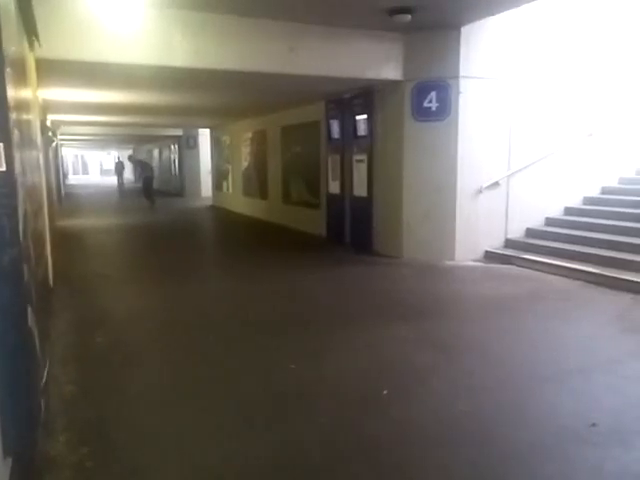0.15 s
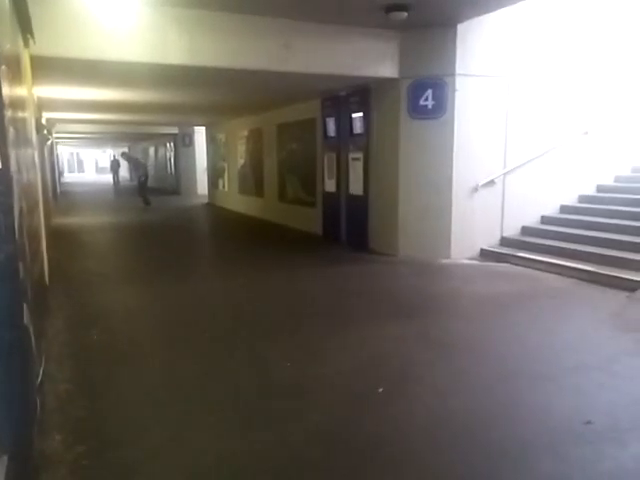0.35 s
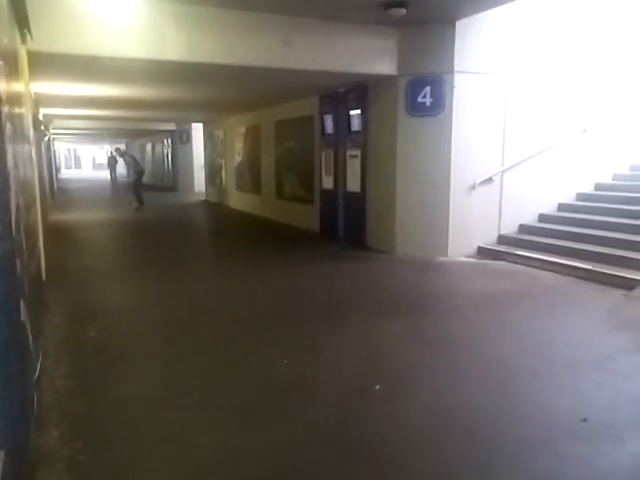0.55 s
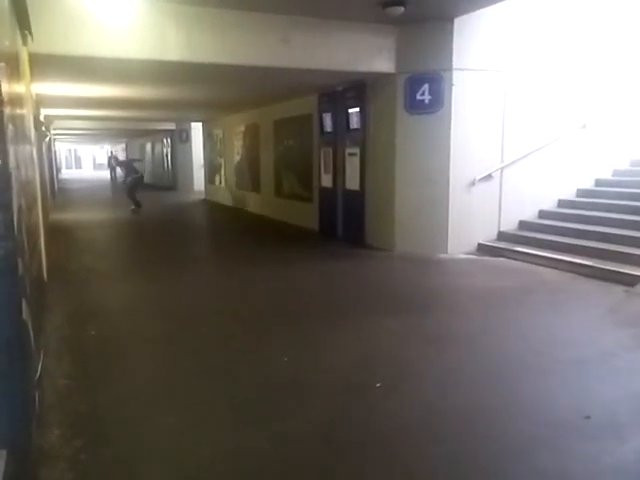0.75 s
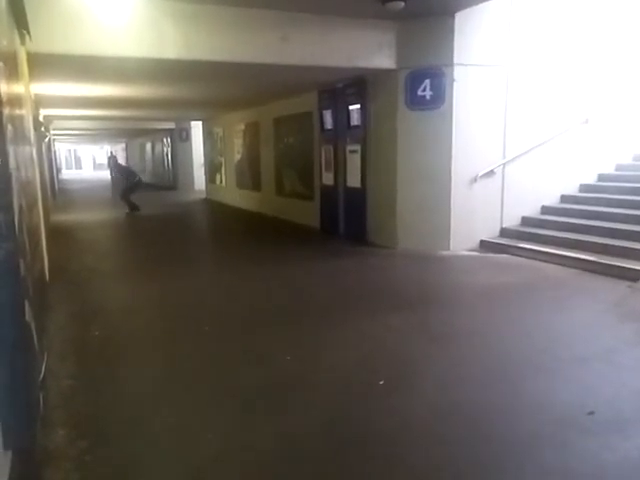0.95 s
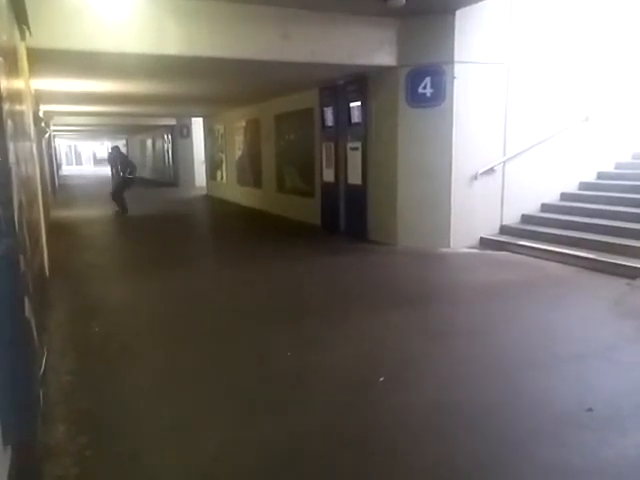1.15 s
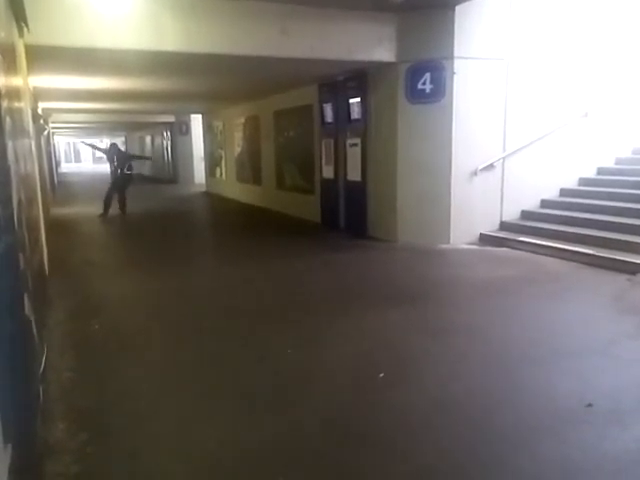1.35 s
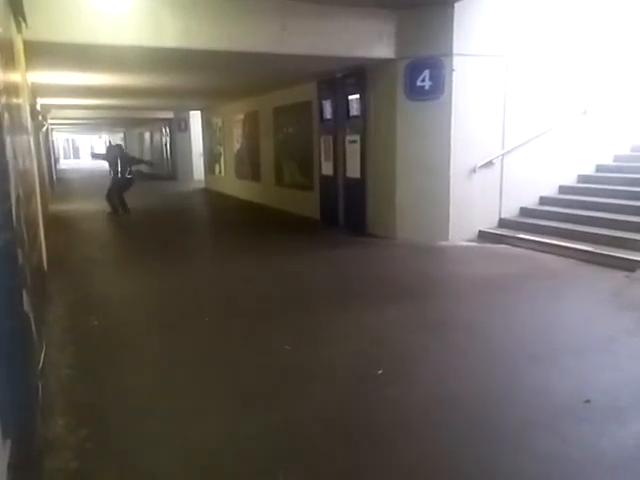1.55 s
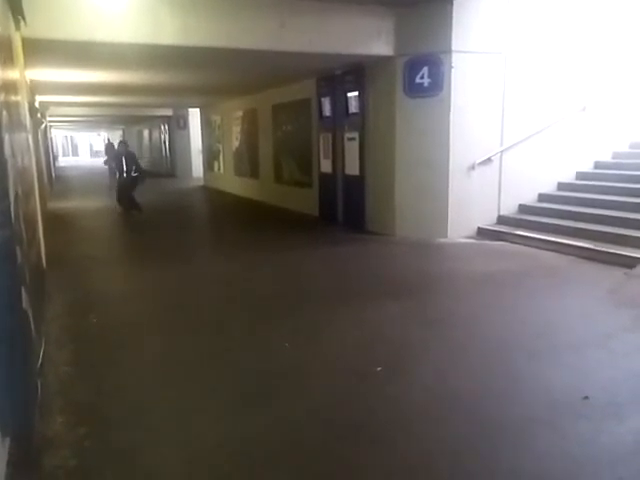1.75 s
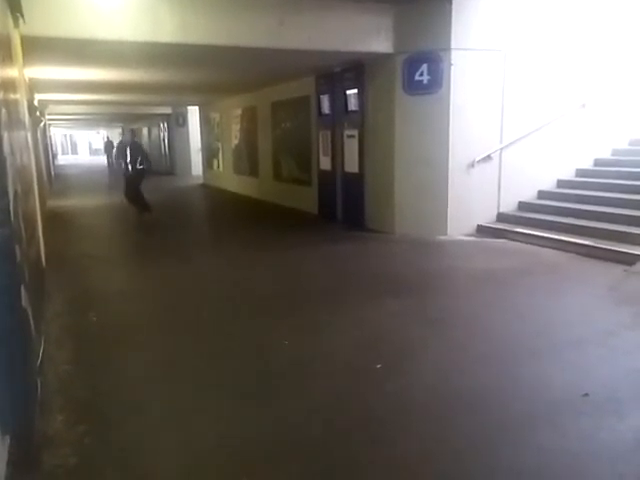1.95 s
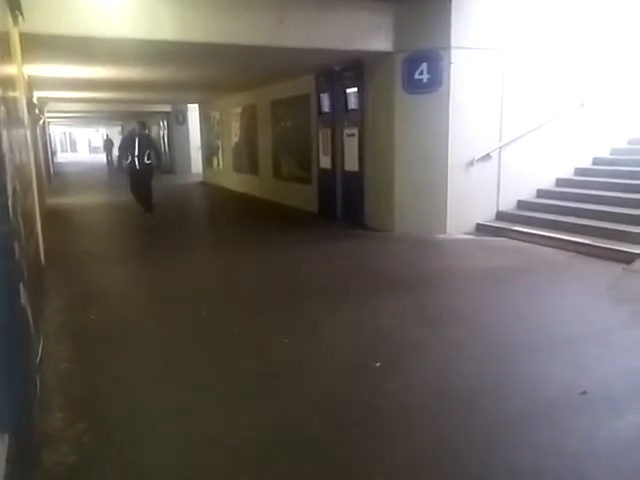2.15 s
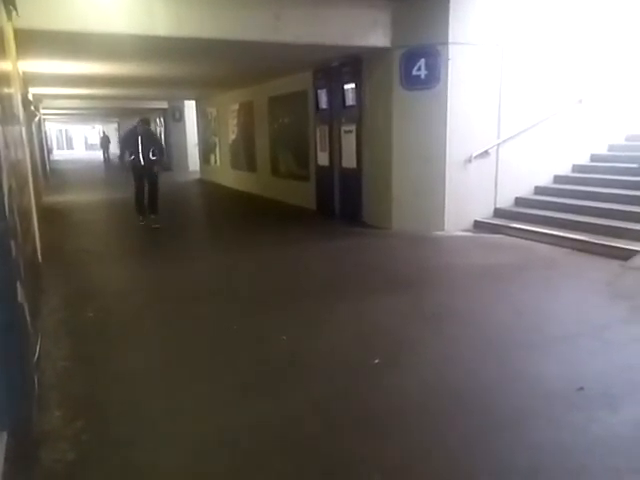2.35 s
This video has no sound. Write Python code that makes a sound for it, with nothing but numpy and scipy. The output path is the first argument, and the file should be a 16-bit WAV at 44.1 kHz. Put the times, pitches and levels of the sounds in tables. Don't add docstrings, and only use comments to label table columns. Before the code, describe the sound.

Skateboard wheels drone over rough concrete, then scrape and squawk loudly sideways in an echoing underpass

```python
import sys
import numpy as np
from scipy import signal
from scipy.fft import rfft, irfft
from scipy.io import wavfile
from scipy.ndimage import uniform_filter1d

SR = 44100
rng = np.random.default_rng(int(sys.argv[2]) if len(sys.argv) > 2 else 0)


def makeup_ratio(level_db):
    decades = np.asarray(level_db, float) / 20
    return 10 ** decades


def persist_wave(psi):
    counts = np.round(np.clip(psi, -1, 1) * 32767).astype(np.int16)
    wavfile.write(sys.argv[1], SR, np.atleast_2d(counts).T)


N = 110250
LEAD = SR

# time [s], scrape level [dB], scrape brightness [dB], chatter level [dB], chatter pitch [Hz].
SLIDE_GRIP = [
    (1.17, -37.5, 1.5, -56, 492),
    (1.27, -25.5, 7.5, -40, 488),
    (1.29, -10.5, 2, -38, 480.4),
    (1.325, -19, 9, -13, 499.7),
    (1.39, -8, 5, -28, 507.7),
    (1.48, -12, 1.5, -25, 515),
    (1.56, -13, 3.5, -7.5, 495.3),
    (1.64, -17, 0, -21, 493),
    (1.72, -43.5, 5, -59, 492),
]


def unit(x):
    return x / np.sqrt(np.mean(x ** 2))


def clock():
    return np.arange(-LEAD, N) / SR


def along(table, column=1):
    rows = np.array(table, float)
    return np.interp(clock(), rows[:, 0], rows[:, column])


def across(table, hz):
    rows = np.array(table, float)
    return np.interp(np.log(hz + 1), np.log(rows[:, 0]), rows[:, 1])


def shape(x, colour):
    # resonance in Hz, width in Hz, lift in dB.
    deck_modes = [(145, 8.3, 2.5), (220.5, 10, 7), (309, 30, 4), (533.6, 33.3, 7), (725, 60, 2),
                  (1990, 320, 1)]
    hz = np.fft.rfftfreq(x.shape[-1], 1 / SR)
    gain_db = across(colour, hz)
    for mode_hz, width_hz, lift_db in deck_modes:
        gain_db = gain_db + lift_db / (1 + (2 * (hz - mode_hz) / width_hz) ** 2)
    return unit(irfft(rfft(x) * makeup_ratio(gain_db), x.shape[-1]))


def brighten(x, lift_db):
    high_pass = signal.butter(2, 1040, "high", fs=SR, output="sos")
    return x + (makeup_ratio(lift_db) - 1) * signal.sosfiltfilt(high_pass, x)


def walk(rate_hz):
    hold = int(SR / rate_hz)
    steps = np.repeat(rng.standard_normal((N + LEAD) // hold + 1), hold)
    smooth = uniform_filter1d(uniform_filter1d(steps, hold), hold)
    return unit(smooth[:N + LEAD])


def grit(per_s):
    where, size, sign = rng.random((3, N + LEAD))
    spread_db = 2.5
    height = makeup_ratio(-spread_db * np.log(1 - .95 * size))
    return (where < per_s / SR) * height * np.sign(sign - .5)


def ports(n):
    spacing_m, sound_m_per_s = .13, 343
    hz = np.fft.rfftfreq(n, 1 / SR)
    alike = np.sinc(2 * hz * spacing_m / sound_m_per_s)
    mid, side = rfft(rng.standard_normal((2, n)))
    shared = mid * np.sqrt(.5 + .5 * alike)
    opposed = side * np.sqrt(.5 - .5 * alike)
    return hz, shared + opposed * np.array([[1], [-1]])


def rumble():
    # frequency in Hz, level in dB.
    rumble_colour = [(20, -44), (48, -12), (75, -17), (115, -29.5), (150, -2.5), (250, -9), (500, -6),
                     (1500, -45)]
    traffic = shape(irfft(ports(N)[1], N), rumble_colour) * makeup_ratio(-41.5 + 2.2 * walk(5.4)[:N])
    thrum_band = signal.butter(2, [25, 70], "band", fs=SR, output="sos")
    thrum = signal.sosfilt(thrum_band, rng.standard_normal((2, N)))
    return traffic + unit(thrum) * makeup_ratio(-80.5)


def echo():
    # frequency in Hz, time to fall by 60 dB in seconds.
    ring_times = [(100, 3.6), (500, 2.02), (1500, 1.92), (2500, 1.77), (5000, 1.42), (10000, 0.53)]
    build_s, early_db, early_s = 0.0038, 7, 0.039
    direct_db, right_late_s = -9, 0.00019
    n = 65536
    t = np.arange(n) / SR
    hz, wash = ports(n)
    centres = 120 * 2. ** np.arange(8)
    tail = 0
    for k, centre_hz in enumerate(centres):
        band = np.interp(np.log(hz + 1), np.log(centres), np.arange(8) == k)
        t60 = across(ring_times, centre_hz)
        tail = tail + irfft(wash * band, n) * 1000 ** (-t / t60) / np.sqrt(t60)
    tail = tail * (1 - np.exp(-t / build_s)) * makeup_ratio(early_db * np.exp(-t / early_s))
    tail = tail / np.sqrt(np.sum(tail ** 2, axis=1, keepdims=True))
    tail[[0, 1], [0, int(right_late_s * SR)]] = makeup_ratio(direct_db)
    return tail


def tunnel(x):
    place = clock() / 0.2022
    heard = 0
    for k in range(4):
        distance = np.clip((place - k + 2) % 4 - 2, -1, 1)
        fade = np.cos(np.pi / 2 * distance)
        heard = heard + signal.fftconvolve((x * fade)[None], echo(), axes=1)
    return heard[:, LEAD:LEAD + N]


def knocks():
    # time in seconds, level in dB, treble lift in dB.
    blows = [
        (0.282, -23, 0),
        (0.396, -17, 3.5),
        (0.601, -41, -6),
        (0.778, -35, -1),
        (1.286, -30, 0),
        (1.384, -13, 13),
        (1.567, -13, -1),
        (2.012, -19, -2),
        (2.137, -17.5, 3),
        (2.302, -26.5, -2),
    ]
    # frequency in Hz, level in dB.
    knock_colour = [(150, -28.5), (500, -23), (1500, 2), (2300, 3), (6500, -8.5), (8000, -14.5),
                    (14000, -13.5)]
    t = clock()
    body = shape(rng.standard_normal(N + LEAD), knock_colour)
    top = body - signal.sosfilt(signal.butter(1, 2500, fs=SR, output="sos"), body)
    out = 0
    for start, level_db, bright_db in blows:
        decay = (t >= start) * np.exp(-np.abs(t - start) / 0.014)
        out = out + makeup_ratio(level_db) * decay * (body + (makeup_ratio(bright_db) - 1) * top)
    return out


def rolling():
    # time in seconds, level in dB, brightness in dB.
    wheel_load = [(0, -22.5, -3), (.3, -22.5, -0.5), (.42, -24, 1), (.54, -22.5, -1), (.64, -26.5, 1),
                  (.79, -25, 5.5), (.95, -24.5, -13.5), (1.2, -25, 2), (1.7, -29, 9.5), (2.0, -23, -3.5),
                  (2.2, -26, 0), (2.35, -35, -1), (2.5, -23, -8)]
    # frequency in Hz, level in dB.
    roll_colour = [(100, -35), (150, -18), (420, -9), (620, -1.5), (1000, -9), (2200, -15.5), (6000, -24),
                   (14000, -41.5)]
    drone = brighten(shape(grit(4000), roll_colour), along(wheel_load, column=2))
    return drone * makeup_ratio(along(wheel_load) + 3.07 * walk(29.89))


def squawks():
    # time in seconds, pitch in Hz, width in Hz, decay in seconds, level in dB.
    bites = [(1.294, 1560, 180, .012, -9), (1.297, 2002, 250, 0.0097, -6), (1.341, 2230, 91, 0.042, -17.5),
             (1.364, 231, 35, 0.023, -22), (1.408, 511, 29, .03, -12), (1.43, 1390, 120, 0.025, -13.5),
             (1.472, 2156, 140, 0.033, -14), (1.516, 1952, 170, 0.011, -10.5),
             (1.543, 725, 38, 0.029, -17.5), (1.551, 992, 7.1, 0.055, -15.5),
             (1.625, 524, 25, 0.035, -19.5), (1.635, 986, 50, 0.025, -16), (0.399, 2230, 100, 0.14, -35)]
    rise_s = 0.0089
    noise = rng.standard_normal(N + LEAD)
    out = 0
    for start, pitch_hz, width_hz, decay_s, level_db in bites:
        t = clock() - start
        ringing = unit(signal.lfilter(*signal.iirpeak(pitch_hz, pitch_hz / width_hz, SR), noise))
        swell = np.exp(np.where(t < 0, t / rise_s, -t / decay_s))
        out = out + makeup_ratio(level_db) * ringing * swell
    return out


def chatter():
    # multiple of the pitch, level in dB.
    overtone_levels = [(1, -2), (2, 0), (3, -4), (4, -4)]
    tilt_db, wobble, patchy_db = -4.5, .012, 2.5
    pitch_hz = along(SLIDE_GRIP, column=4) * (1 + wobble * walk(60))
    turn = 2 * np.pi * np.cumsum(pitch_hz) / SR
    tone = 0
    for k, level_db in overtone_levels:
        tone = tone + makeup_ratio(level_db + tilt_db * k + patchy_db * walk(20)) * np.sin(k * turn)
    return tone * makeup_ratio(along(SLIDE_GRIP, column=3))


def scrape():
    # frequency in Hz, level in dB.
    scrape_colour = [(60, -37.5), (400, -8.5), (520, -4), (1200, -3), (2250, -4), (6000, -12.5),
                     (15500, -22.5)]
    drag = brighten(shape(grit(6000), scrape_colour), along(SLIDE_GRIP, column=2))
    return drag * makeup_ratio(along(SLIDE_GRIP) + 0.75 * walk(40))


def scene():
    board = rolling() + scrape() + chatter() + knocks() + squawks()
    return tunnel(board) + rumble()


def port_colour(x):
    # frequency in Hz, response in dB.
    port_response = [(2300, 3.5), (2600, -3.5), (4500, -9.5), (6200, -10), (7600, -20), (10500, -18.5),
                     (13000, -28.5), (15500, -41)]
    # frequency in Hz, left minus right in dB.
    port_tilt = [(100, -1), (700, 1.25), (1200, 0.5), (2300, -2), (4000, -0.5), (6200, 3), (7400, 13.5),
                 (14000, 10.5)]
    hz = np.fft.rfftfreq(N, 1 / SR)
    tilt_db = across(port_tilt, hz) * np.array([[.5], [-.5]])
    return irfft(rfft(x) * makeup_ratio(tilt_db + across(port_response, hz)), N)


def mute_faint_treble(x):
    floor_db, from_hz, follows = -106, 6800, 1.3
    hz, _, z = signal.stft(x, SR, nperseg=2048, scaling="psd")
    bands = (np.abs(z[:, :-1]) ** 2).reshape(2, 256, 4, -1).mean(axis=2)
    power = np.repeat(bands, 4, axis=1)
    loud = power.sum(axis=(0, 1))
    threshold = makeup_ratio(2 * floor_db) * np.maximum(loud / np.median(loud), 1) ** follows
    keep = (power > threshold) | (hz[:-1, None] < from_hz)
    keep = np.pad(keep, ((0, 0), (0, 1), (0, 0)))
    return signal.istft(z * keep, SR, scaling="psd")[1][:, :N]


def open_microphone(x):
    since = np.arange(N) / SR - .22635
    pop = makeup_ratio(-10) * np.exp(-np.abs(since) / 0.0015) * np.cos(2 * np.pi * 665 * since)
    return (x + pop) * (since >= 0)


def overload(x):
    return x / (1 + (x / 1.83) ** 4) ** 0.22


def low_pass(x):
    return signal.sosfilt(signal.butter(12, 15800, fs=SR, output="sos"), x)


def record(dry):
    heard = mute_faint_treble(port_colour(dry))
    mix = overload(open_microphone(heard))
    return low_pass(mix)


dry = scene()
out = record(dry)
persist_wave(out)
```